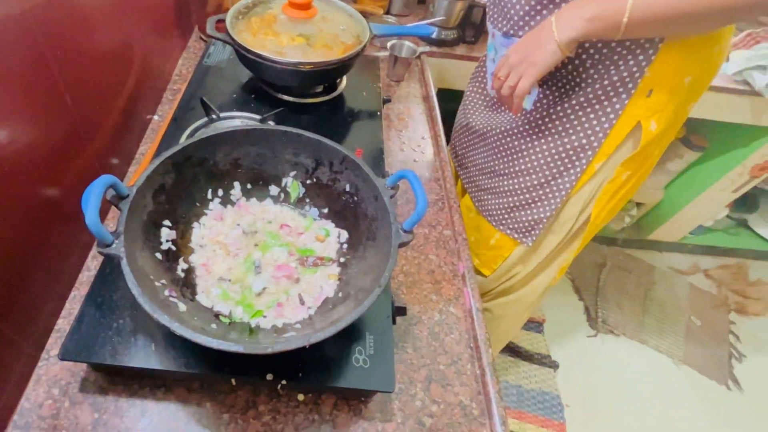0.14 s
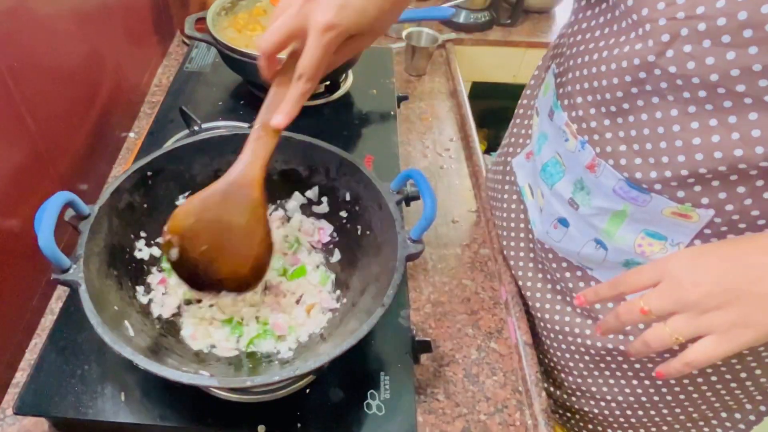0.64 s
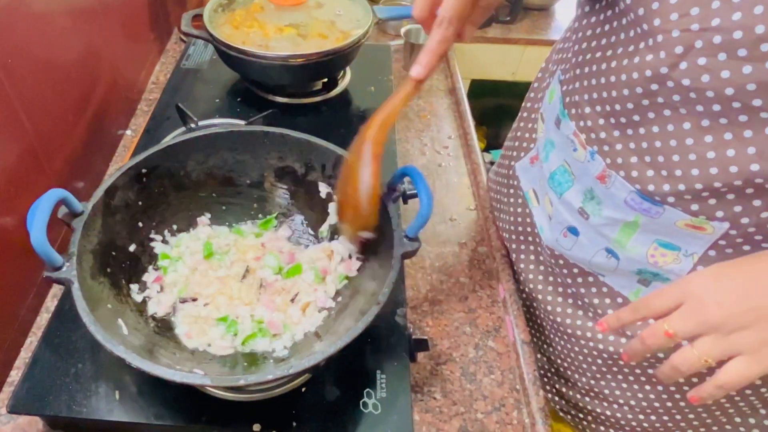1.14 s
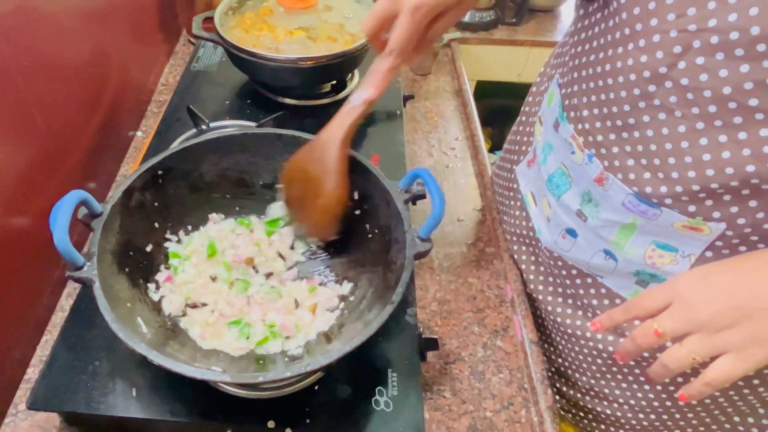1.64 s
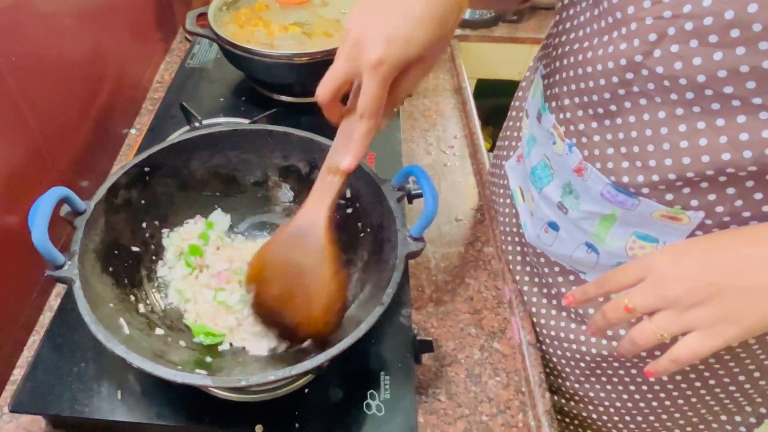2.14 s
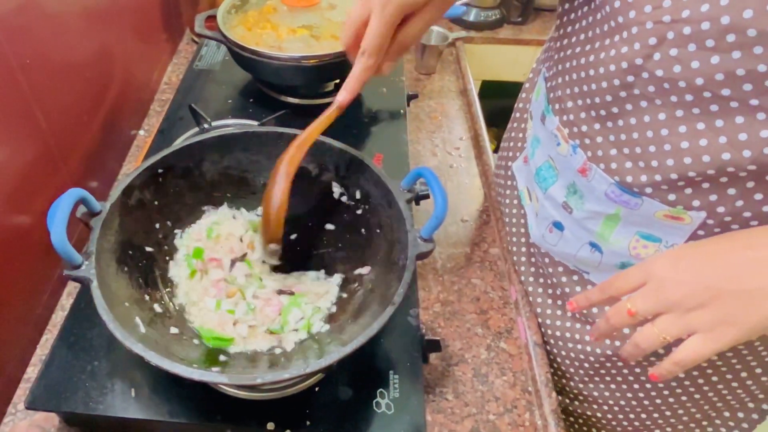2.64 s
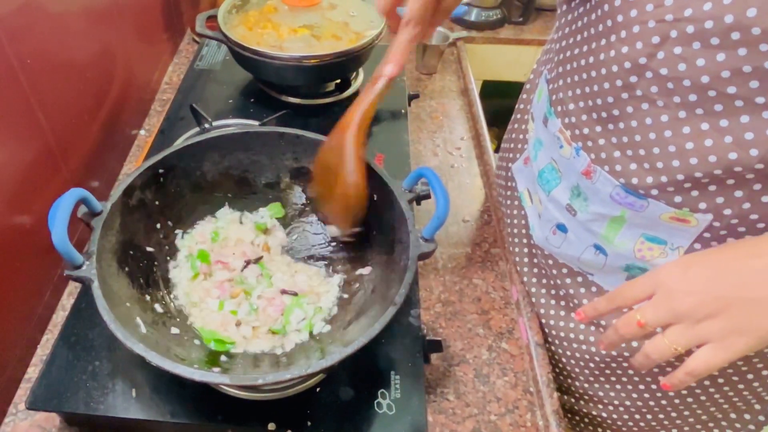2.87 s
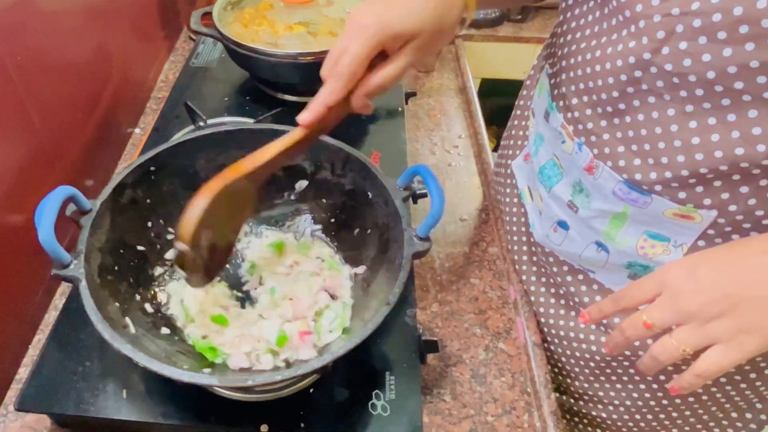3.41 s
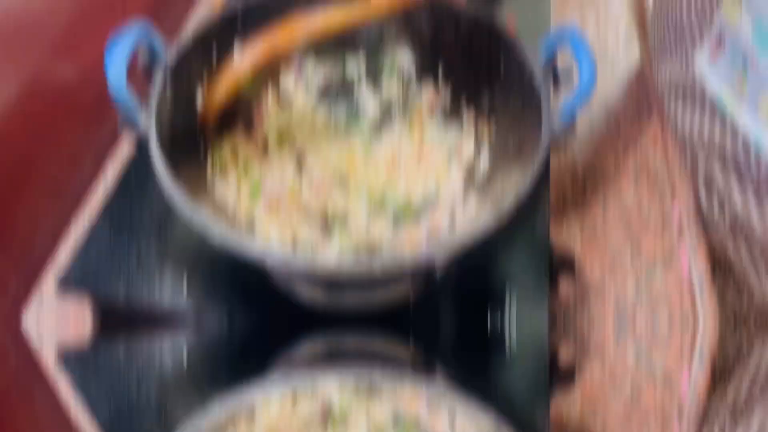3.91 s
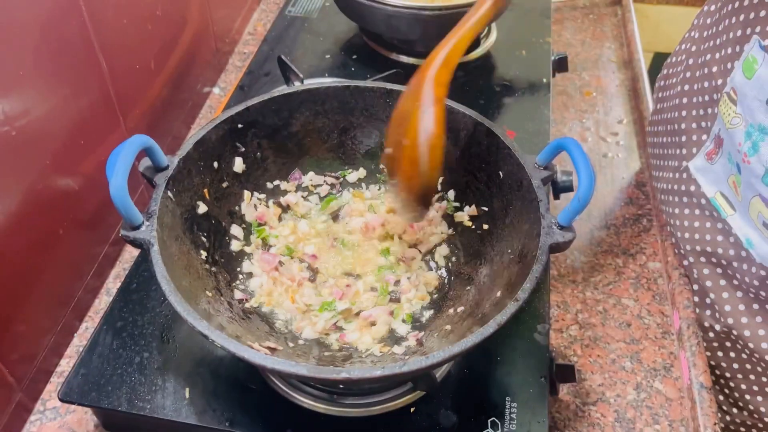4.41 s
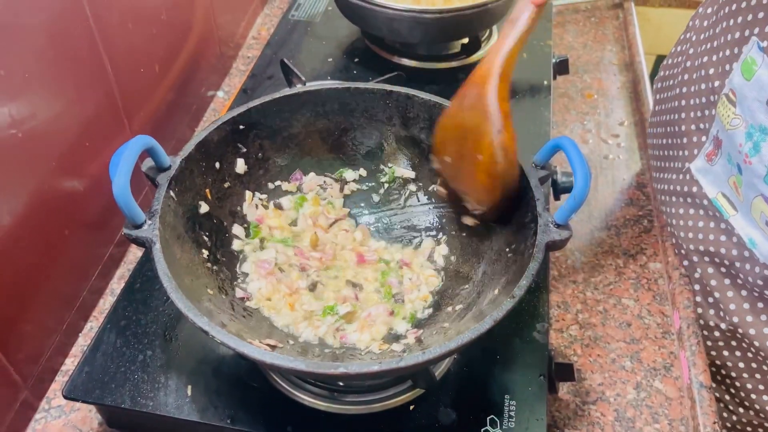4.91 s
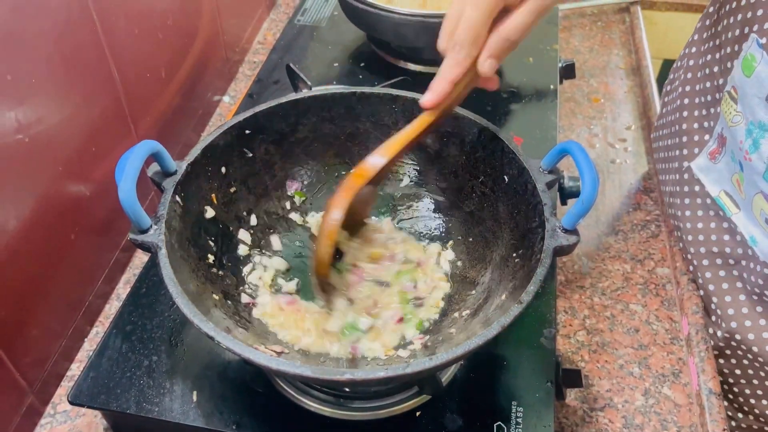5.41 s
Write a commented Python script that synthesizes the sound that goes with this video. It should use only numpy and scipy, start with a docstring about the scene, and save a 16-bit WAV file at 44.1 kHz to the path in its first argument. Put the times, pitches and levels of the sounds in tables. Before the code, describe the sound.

A small hard-walled kitchen, heard close to the stove in stereo. From 0 s fine high fizz and coarser crackle of onions in oil run over a low burner roar and faint rumble, with the tail of a deep thud. At 0.25 s there is an abrupt join; faint spatula taps, scraping and a cluster of sharp spits follow until about 1.0 s. Loud dry wooden clacks strike the iron pan at 1.2, 1.5, 2.4 and 2.8 s, with soft scrapes between and a faint low pan hum lingering, mostly damped near 1.9 s. A strong spit snaps at 3.45 s and a duller knock lands at 3.5 s. The sound fades to silence at 3.87 s and rises again by 4.2 s, with softer sizzle and stronger flame. A heavy door thuds at 4.4 s in quick stages, booming and rattling; clacks follow at 4.5 and 4.9 s, then light scraping and small spits around 5.3 s.

```python
"""Chopped onions sizzle in hot oil in an iron pan: uneven noise grains, with loud spits as filtered noise bursts.
A wooden spatula knocks the pan as decaying modes and scrapes it as resonant noise; the lowest pan mode sings on.
Behind are a burner's roar, a rumble and a heavy door thud, modes driven by blows, in a small tiled kitchen.
Two microphone ports hear it in three stretches: an abrupt early join, then a fade through silence."""
import sys
import numpy as np
from scipy import signal
from scipy.fft import rfft, irfft
from scipy.io import wavfile
from scipy.ndimage import uniform_filter1d

SR = 44100
rng = np.random.default_rng(int(sys.argv[2]) if len(sys.argv) > 2 else 0)


def generate_wav(sig):
    """Save sig (samples, or channels by samples) to the path in sys.argv[1] as 16-bit PCM at SR."""
    pcm = np.round(np.clip(np.atleast_2d(sig).T, -1, 1) * 32767).astype(np.int16)
    wavfile.write(sys.argv[1], SR, pcm)


def invert_db(x):
    """Field ratio 10**(x/20) for x, a level in decibels (scalar or array-like)."""
    u = np.asarray(x, float) / 20
    return 10 ** u


N = 243872
T = np.arange(N) / SR  # s
HZ = np.maximum(np.fft.rfftfreq(N, 1 / SR), 1)
JOIN_S = 0.252  # the first stretch ends


def set_rms(x, db):
    """Energy normalisation: scale a signal to an rms level in dB."""
    return x * invert_db(db) / np.sqrt(np.mean(x ** 2))


def across(table, column):
    """Logarithmic frequency axis: interpolate one table column at every bin."""
    table = np.array(table)
    return np.interp(np.log(HZ), np.log(table[:, 0]), table[:, column])


def colour(x, table):
    """Linear filtering: shape the spectrum by (frequency [Hz], level [dB]) points, silent outside them."""
    inside = (HZ > table[0][0]) & (HZ < table[-1][0])
    return irfft(rfft(x) * invert_db(across(table, 1)) * inside, N)


# the two microphone ports:
# (frequency [Hz], likeness [0-1], left minus right [dB], phase the right leads by [rad])
PORT_PAIR = [(39.8, 0.9, 4, -0.8), (200, 0.98, 2, 0.79), (490, 0.64, -0.5, 0.7), (1100, .3, 5.5, -1),
             (1800, 0.06, 1.5, -2), (2800, 0.8, 2, -1.5), (4740, 0.21, 8.5, -3), (6560, 0.2, 6.5, -6),
             (7740, 0.8, 3, -4), (8450, 0.68, 2.5, -1.76), (10800, 0.1, -3.5, 0.4), (10920, 1, 3.5, -17),
             (13430, 0.8, -2.5, -1), (16740, .95, 13, -3.5)]


def ports(envelope):
    """Partial coherence: noise under one envelope, partly shared by the two ports and partly each their own."""
    shared, left, right = rfft(envelope * rng.standard_normal((3, N)))
    likeness = np.clip(across(PORT_PAIR, 1), 0, 1)
    common = np.sqrt(likeness) * shared
    own = np.sqrt(1 - likeness)
    tilt = invert_db(across(PORT_PAIR, 2) / 2)
    lead = np.exp(1j * across(PORT_PAIR, 3))
    left = tilt * (common + own * left)
    right = (common * lead + own * right) / tilt
    return irfft(np.array([left, right]), N)


def grains(per_s, spread_db, decay_ms, bed):
    """Shot noise: envelope of many random decaying bursts of very uneven size over a steady bed."""
    sizes = invert_db(spread_db * np.minimum(rng.exponential(size=N), 4))
    starts = (rng.random(N) < per_s / SR) * sizes
    bursts = signal.lfilter([1], [1, -np.exp(-1000 / (decay_ms * SR))], starts)
    return np.sqrt(bed ** 2 + set_rms(bursts, 0) ** 2)


def ring(modes, seconds, phase=0):
    """Modal superposition: a sum of exponentially decaying sines."""
    t = T[:int(seconds * SR)]
    hz, db, t60 = np.array(modes).T[:, :, None]
    decay = np.exp(-np.log(1000) * t / t60)
    return np.sum(invert_db(db) * np.sin(2 * np.pi * hz * t + phase) * decay, axis=-2)


def push(ms):
    """Impulse of a contact force: one smooth hump of unit area."""
    hump = np.hanning(max(int(ms * SR / 1000), 1) + 2)
    return hump / hump.sum()


def humps(table, column):
    """Piecewise-linear modulation in dB: a triangle around each row's (peak, half length)."""
    return sum(row[column] * np.clip(1 - np.abs(T - row[0]) / row[1], 0, 1) for row in table)


def slow_noise(samples):
    """Low-pass random modulation: twice-averaged noise."""
    return uniform_filter1d(uniform_filter1d(rng.standard_normal(N), samples), samples)


def add(out, sound, s, pan_db):
    """Superposition: mix a one- or two-channel sound in at time s, left minus right by pan_db."""
    i = int(s * SR)
    sound = sound[..., :N - i] * invert_db(np.array([[pan_db], [-pan_db]]) / 2)
    out[:, i:i + sound.shape[1]] += sound


# spectrum of the background rumble: (frequency [Hz], relative level [dB])
RUMBLE_COLOUR = [(22, -22.5), (40, -16.5), (65, -6), (110, -6), (170, -8.5), (250, -23)]


def rumble():
    """Stationary noise: a steady deep background at an rms of -57 dB."""
    return set_rms(colour(ports(np.ones(N)), RUMBLE_COLOUR), -57)


# spectrum of the flame: (frequency [Hz], relative level [dB])
ROAR_COLOUR = [(90, -13), (150, -1), (230, 2.5), (330, -3.5), (450, -7), (700, -11), (1000, -10.5)]


def burner(roar_db):
    """Turbulent combustion noise: the low roar of the flame, wavering in level."""
    flutter_db, flutter_per_s = 1.85, 20  # rms dB; averaging windows per second
    waver_db = flutter_db * set_rms(slow_noise(int(SR / flutter_per_s)), 0)
    return invert_db(roar_db + waver_db) * set_rms(colour(ports(np.ones(N)), ROAR_COLOUR), 0)


# the door lands in stages:
# (time [s], frame blow [dB], panel blow [dB], panel softness [ms], rattle [dB])
THUD_STAGES = [(4.397, -53, -27.5, 2.3, -29.5), (4.41, -34, -26.5, 2.1, -23.5),
               (4.419, -23.5, -20.5, 1.8, -33), (4.431, -29, -24, 2.1, -32), (4.449, -19, -24.5, 2, -42.5),
               (4.461, -27.5, -30, 2.2, -34), (4.491, -40.5, -31.5, 2.2, -63.5)]
# door modes, five of the frame and then the panel's: (frequency [Hz], level [dB], t60 [s])
DOOR_MODES = [(42.4, 2, 0.82), (51.5, -10, .9), (61.6, -9.5, 1.12), (121, -0.5, 0.31), (131.2, -10.5, 0.7),
              (200, -14, 0.063), (288, -3.5, 0.15), (362, -9.5, 0.44), (395, -1, 0.069), (513, -1.5, 0.19),
              (608, -6.5, 0.053), (855, -10.5, 0.32), (1080, -3, 0.15), (1190, -20, 0.091)]
# a thud already ringing at the start: (frequency [Hz], level [dB], t60 [s])
RINGING_THUD = [(43.5, -48.5, 1.5), (135, -40, 1.6)]
# spectrum of the loose fittings: (frequency [Hz], relative level [dB])
RATTLE_COLOUR = [(500, 0), (1200, -8), (2500, -9.5), (3600, -1), (4800, -2.5), (7000, -14), (13000, -15)]


def door():
    """Forced modal response: soft heavy blows ring the deep frame and the panel; loose fittings rattle brightly."""
    deep, panel, rattle = np.zeros((3, 2, N))
    t = T[None, :8000]
    rattle_shape = np.exp(-t / 0.034) * (1 - np.exp(-t / 0.003))
    for s, deep_db, panel_db, soft_ms, rattle_db in THUD_STAGES:
        add(deep, invert_db(deep_db) * push(2.5)[None], s, 0.8)
        force = push(soft_ms)
        roughness = 1 + 3.7 * rng.standard_normal((2, len(force)))
        add(panel, invert_db(panel_db) * force * roughness, s, 2.5)
        add(rattle, invert_db(rattle_db) * rattle_shape, s, 0)
    boom = np.zeros((2, N))
    for force, modes in [(deep, DOOR_MODES[:5]), (panel, DOOR_MODES[5:])]:
        boom += signal.fftconvolve(force, ring(modes, 1.2)[None])[:, :N]
    # slow random level modulation roughens the boom
    wobble_db = 1.884 * set_rms(slow_noise(700), 0)
    boom = boom * invert_db(wobble_db)
    add(boom, ring(RINGING_THUD, JOIN_S), 0, 1.5)
    rattle_grains = grains(700, 3.0, 3.9, bed=0.98)
    return boom, colour(ports(rattle[0] * rattle_grains), RATTLE_COLOUR)


# spectrum of the room's reply: (frequency [Hz], relative level [dB])
KITCHEN_COLOUR = [(60, -7.5), (300, 5), (1200, -5), (2200, -5), (3000, -5), (6000, -4.5), (15000, -22.5)]


def kitchen(struck):
    """Room impulse response of hard walls: after a short gap a dense tail, unlike at the two ports,
    with two stronger bunches of early echoes in it."""
    t = T[:int(0.7 * SR)]
    early = sum(gain * np.exp(-((t - s) / 0.0034) ** 2) for s, gain in [(0.013, 0.99), (0.025, 0.23)])
    dense = np.exp(-np.log(1000) * t / 0.39) * np.clip((t - 0.004) / 0.0028, 0, 1)  # t60 0.39 s
    response = set_rms((dense + early) * rng.standard_normal((2, len(t))), -47.5)
    return colour(signal.fftconvolve(struck, response, axes=1)[:, :N], KITCHEN_COLOUR)


# blows that wake the lowest pan mode: (time [s], level [dB], time of damping [s])
NOTE_BLOWS = [(.788, -47, 1.95), (1.18, -48, 1.95), (1.537, -52.5, 1.84), (2.437, -56, 3.15),
              (2.79, -57.5, 3.3)]


def pan_note():
    """Lightly damped resonance: the pan's lowest mode sings on after a blow until the spatula damps it."""
    note_hz, rise_s = 257.4, 0.015
    free_t60_s, damped_t60_s = 3.8, 0.44  # the damping adds to the free decay
    power = 0
    for s, db, damped_s in NOTE_BLOWS:
        free_db = 60 * np.maximum(T - s, 0) / free_t60_s
        damped_db = 60 * np.maximum(T - damped_s, 0) / damped_t60_s
        rise = np.clip((T - s) / rise_s, 0, 1)
        power = power + (invert_db(db - free_db - damped_db) * rise) ** 2
    note = np.sqrt(2 * power) * np.sin(2 * np.pi * note_hz * T)
    return note * invert_db(np.array([[1.5], [-1.5]]))


# resonances that a dragged blade wakes in the pan: (frequency [Hz], width [Hz], peak [dB])
SCRAPE_RESONANCES = [(694, 137, -3), (837, 36, -6.5), (1280, 380, -1.5), (2060, 580, -8)]
# brief changes of the scraping noise and of the low roar, around drags, knocks and the thud:
# (peak time [s], half length [s], scrape lift [dB], roar lift [dB])
BRIEF_LIFTS = [(.43, 0.095, 10, 1.5), (.47, 0.025, 2, -5), (.57, 0.055, 5, -8.5), (.84, .07, 4, 9.5),
               (1.02, 0.047, 3, -6), (1.24, 0.11, 8, 7.5), (1.6, 0.091, -2, 0), (2.17, 0.12, 3.5, 6.5),
               (2.55, 0.14, 2, 1), (2.93, 0.15, 0.5, 7.5), (3.28, 0.228, 4, 0), (4.14, .08, 7.5, 2.5),
               (4.41, 0.023, 16, 14.5), (4.53, 0.17, 7.5, 8), (4.92, 0.047, 9, 0.5), (5.368, 0.041, 4.5, 7)]


def scrape(base_db):
    """Stick-slip friction: the blade stutters over the iron, dense uneven slips through broad resonances."""
    shape = 0
    for hz, width, peak_db in SCRAPE_RESONANCES:
        shape = shape + invert_db(peak_db) / np.sqrt(1 + (2 * (HZ - hz) / width) ** 4)
    slips = ports(grains(230, 2.3, 2.8, bed=1.57))
    scrape_db = base_db + humps(BRIEF_LIFTS, column=2)
    return invert_db(scrape_db) * set_rms(irfft(rfft(slips) * shape, N), 0)


# spatula on iron: (time [s], peak [dB], handle pitch [Hz], blade minus handle [dB],
# hardness [dB], left minus right [dB])
KNOCK_BLOWS = [(.282, -26.5, 1440, -9.5, -7, 3), (.328, -30.5, 1290, -3, 8, 4), (.423, -29, 1340, 2, 9, 9),
               (.467, -23.5, 1260, -8, 7.5, 9.5), (.783, -25, 1280, -16, -7, 2),
               (.834, -29.5, 1240, -8, 3, 7), (.874, -28.5, 1310, -6, 6, 4), (1.178, -3.5, 1350, 5, 8, 4),
               (1.535, -7.5, 1100, 8.5, 4, 3), (1.702, -32, 1250, -11, -6, 3),
               (1.955, -33, 1280, -14, -5, -3), (2.099, -31, 1260, -1, -10, 4),
               (2.435, -10.5, 1280, -1.5, -1, 4), (2.504, -30.5, 1510, 0, 3.5, 3),
               (2.787, -4.5, 1280, 2.5, 6.5, 4.5), (3.531, -22, 1080, 17, -3.5, 3),
               (4.526, -10, 1267, -1.5, -4.5, 3.5), (4.819, -35, 1380, -11, -4, 11),
               (4.866, -7, 1434, 3, 7, 4.5), (5.263, -26.5, 1100, -9, -19, 2.5)]
# spatula modes, low, high and of the blade: (frequency [Hz], level [dB], t60 [s])
LOW_MODES = [(430, -6, 0.098), (571, 5.5, 0.048), (751, 3, 0.049), (889, 4.5, 0.026), (1080, -7.5, .04)]
HIGH_MODES = [(2354, -9.5, 0.045), (3235, -6, .012), (5250, -21.5, .02)]
BLADE_MODES = [(1818, -1.5, 0.052), (1963, 1.7, 0.035), (2190, -16.5, 0.021)]
# gaps where neighbouring modes cancel: (frequency [Hz], width [Hz])
MODE_GAPS = [(1000, 49), (1540, 27), (2850, 230)]
# pan modes: (frequency [Hz], level [dB], t60 [s])
PAN_MODES = [(360.5, 1, 0.4), (489, 3.5, .3), (669, 4.9, 0.26), (912, 0.46, 0.25)]


def knocks():
    """Impact excitation, wood on iron: quick spatula modes, choked as the blade rebounds, and a faint pan ring."""
    handle_t60_s = 0.051
    low_db, edge_db, edge_slope = -8.5, -13, 1.5  # hardness trades low modes for the hard edge
    contact_s, softer = 0.0013, 0.38  # rise of a middling knock; dB longer per dB less hard
    wood, iron = np.zeros((2, 2, N))
    chances = rng.standard_normal((len(KNOCK_BLOWS), 5))
    for (s, db, handle_hz, blade_db, hard_db, pan_db), chance in zip(KNOCK_BLOWS, chances):
        # each mode reaches the ports in its own phase
        phase = np.array([np.zeros(5), 1.34 + 0.5 * chance])
        handle = [(handle_hz, 0, handle_t60_s), (handle_hz * 1.082, -4, handle_t60_s)]
        groups = [(BLADE_MODES, min(blade_db, 0)), (LOW_MODES, low_db - hard_db),
                  (handle, min(-blade_db, 0)), (HIGH_MODES, edge_db + edge_slope * hard_db)]
        tap = sum(invert_db(group_db) * ring(modes, 0.065, phase[:, :len(modes), None])
                  for modes, group_db in groups)
        t = T[:tap.shape[1]]
        rise_s = contact_s * invert_db(-softer * hard_db)
        contact = np.sin(np.pi / 2 * np.minimum(t / rise_s, 1)) ** 2
        choke = 0.17 + 0.77 / (1 + (t / 0.0041) ** 6)
        tap = tap * contact * choke
        add(wood, invert_db(db) * tap / np.abs(tap.mean(0)).max(), s, pan_db)
        pan_rise = np.minimum(T[:SR // 2] / 0.0025, 1)
        add(iron, invert_db(db - 38) * ring(PAN_MODES, 0.5) * pan_rise, s, 1.5)
    for hz, width in MODE_GAPS:
        wood = signal.lfilter(*signal.iirnotch(hz, hz / width, fs=SR), wood)
    # so small a blade radiates little bass
    return signal.sosfilt(signal.butter(2, 260, "high", fs=SR, output="sos"), wood), iron


# bursting steam pockets: (time [s], peak [dB], centre [Hz], left minus right [dB])
STEAM_POPS = [(0.0692, -27, 10200, 6), (0.3274, -20.5, 11200, 3.0), (0.404, -23, 3150, 10),
              (0.471, -19.5, 4660, 4.5), (0.5497, -26, 11200, 3.0), (0.585, -28, 5490, 6),
              (0.633, -21, 11800, 3.5), (0.8739, -21, 5430, 3), (1.0233, -19, 12300, 3),
              (1.4394, -25, 11300, 3.5), (1.522, -28, 11500, -5), (2.887, -24, 3940, 6),
              (3.447, -14.5, 4390, 3.5), (4.1071, -32, 12800, -4), (4.7184, -29, 10800, 1.5),
              (5.336, -27, 12700, -3), (5.3654, -21.5, 10500, 0)]


def spits():
    """Transient steam release: single loud pops, each a broad noise burst about a millisecond long."""
    out, t = np.zeros((2, N)), T[:600]
    burst = np.exp(-t / 0.00076) * np.minimum(t / 0.00018, 1)
    noises = rng.standard_normal((len(STEAM_POPS), 2, 600))
    for (s, db, hz, pan_db), noise in zip(STEAM_POPS, noises):
        edges = [hz * 0.55, min(hz * 1.54, 14500)]
        band = signal.butter(2, edges, "band", fs=SR, output="sos")
        source = np.sign(noise) + 0.37 * noise[0]  # own to each port, plus a shared part
        pop = signal.sosfilt(band, source * burst)
        add(out, invert_db(db) * pop / np.abs(pop).max(), s, pan_db)
    return out


# spectra of the fine fizz and the coarse crackle: (frequency [Hz], relative level [dB])
FINE_COLOUR = [(5000, -34.5), (7500, -9.5), (9000, -5.5), (10800, -1.5), (12000, -0.5), (13200, -4),
               (14200, -6.5), (14750, -12), (15100, -45)]
COARSE_COLOUR = [(400, -4.5), (1000, -12.5), (2200, -5), (3200, -1), (4800, -1.5), (6500, -4.5), (8000, -7),
                 (10000, -40)]
# wet onion meets hot oil and the fizz flares:
# (peak time [s], half length [s], fine lift [dB], coarse lift [dB])
FLARE_LIFTS = [(.41, .04, 5, 8), (.47, .02, 3, 5), (.57, .05, 2, 2), (.63, .012, 3, -1),
               (.83, 0.029, 5, 6.5), (.88, 0.041, 7.5, 5.5), (1.02, 0.032, 4.5, 6.5), (1.42, 0.073, 3, 4.5),
               (1.68, .07, 2.5, 1.5), (1.84, 0.069, 1.5, -2), (2.1, .05, 0.5, 6), (2.25, 0.077, 1, 5.5),
               (2.51, 0.078, 3.5, 5.5), (2.94, 0.026, 5, 3), (3.3, 0.13, 1, 2.5), (4.6, 0.14, 2, 2.5),
               (4.974, 0.091, 4, 3.5), (5.366, 0.043, 4, 3.5)]


def sizzle(fine_db, coarse_db):
    """Bubble noise of boiling water: small bubbles fizz high, larger ones crackle lower, some bursts span both."""
    wide = grains(150, 3.96, 0.64, bed=3.7)
    fine = colour(ports(wide * grains(700, 3.4, 0.25, bed=1.55)), FINE_COLOUR)
    coarse = colour(ports(wide * grains(500, 3.6, 1.0, bed=2.3)), COARSE_COLOUR)
    fine_db = fine_db + humps(FLARE_LIFTS, column=2)
    coarse_db = coarse_db + humps(FLARE_LIFTS, column=3)
    return invert_db(fine_db) * set_rms(fine, 0) + invert_db(coarse_db) * set_rms(coarse, 0)


# base levels of each stretch, before the lifts:
# (start time [s], fine fizz [dB], coarse fizz [dB], spatula scrape [dB], burner roar [dB])
BASE_LEVELS = [(0, -44, -44.5, -48, -51.5), (.252, -43.5, -43, -47, -55), (3.866, -49, -48.5, -51, -47)]


def scene():
    """Linear superposition of all sources; the knocks, the spits and the door's boom also fill the room."""
    start, *columns = np.transpose(BASE_LEVELS)
    stretch = np.searchsorted(start, T, "right") - 1
    fine_db, coarse_db, scrape_db, roar_db = (column[stretch] for column in columns)
    roar = burner(roar_db + humps(BRIEF_LIFTS, column=3))
    boom, rattle = door()
    wood, iron = knocks()
    pops = spits()
    room = kitchen(wood + 2.4 * pops + 0.2 * boom)
    background = rumble() + roar + boom + rattle + room
    spatula = pan_note() + scrape(scrape_db) + wood + iron
    return background + spatula + pops + sizzle(fine_db, coarse_db)


def roll_off(x):
    """The treble ends steeply here."""
    return signal.sosfilt(signal.butter(12, 15820, fs=SR, output="sos"), x)


def record(dry):
    """High-pass response of the microphone, then gain: a quick rise after the join, later a fade out and in."""
    rise_s = 0.017
    fade_s, fade_half_s, fade_bend = 3.866, 0.37, 1.115  # silent moment; time each way; curve exponent
    heard = signal.sosfilt(signal.butter(2, 32, "high", fs=SR, output="sos"), dry)
    rise = np.where(T < JOIN_S, 1, np.clip((T - JOIN_S) / rise_s, 0.05, 1))
    fade = np.clip(np.abs(T - fade_s) / fade_half_s, 0, 1) ** fade_bend
    return roll_off(heard * rise * fade)


dry = scene()
out = record(dry)
generate_wav(out)
```